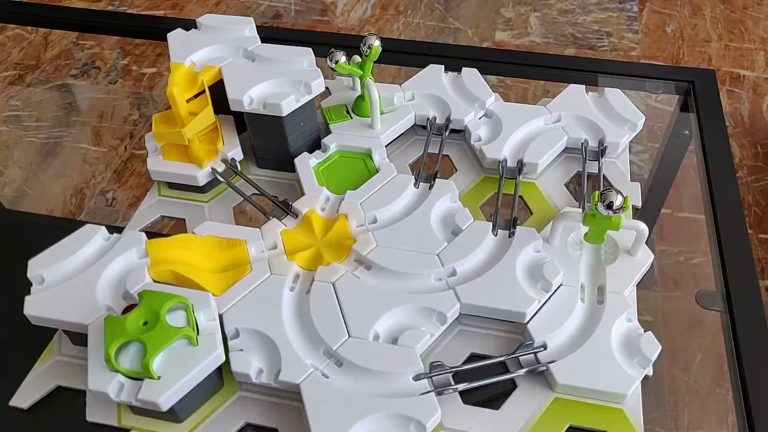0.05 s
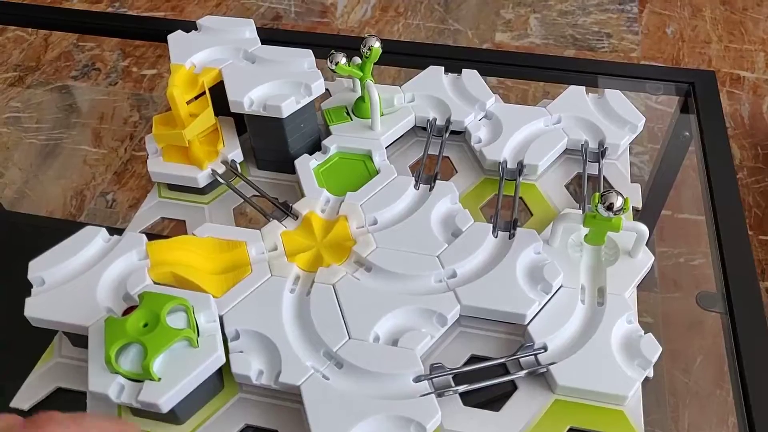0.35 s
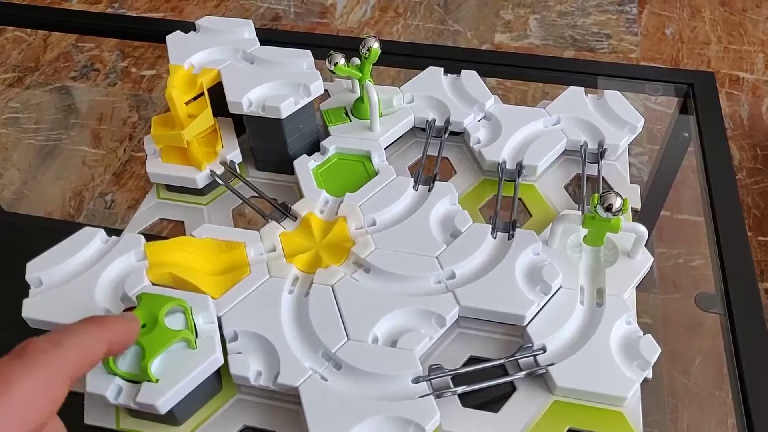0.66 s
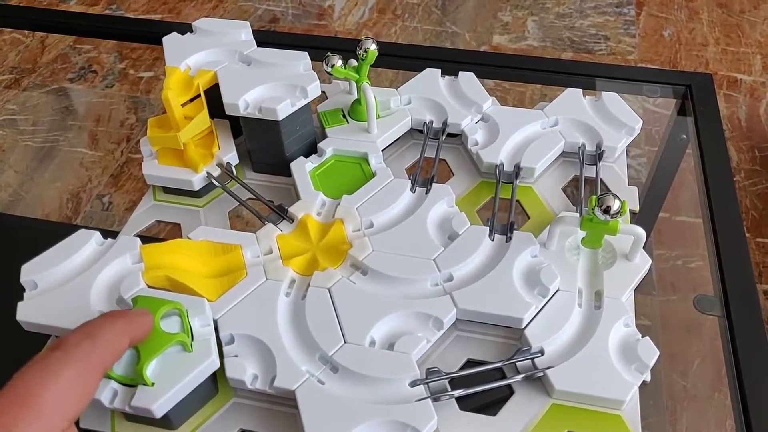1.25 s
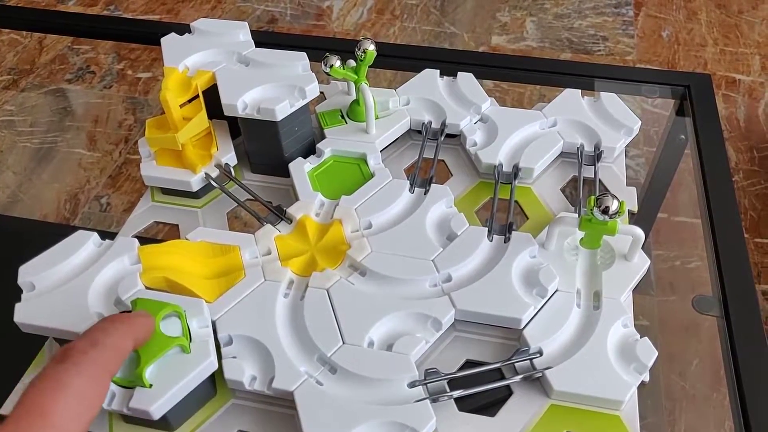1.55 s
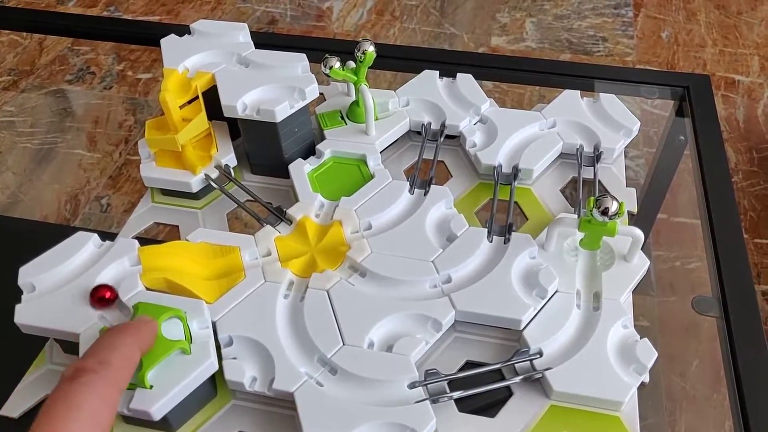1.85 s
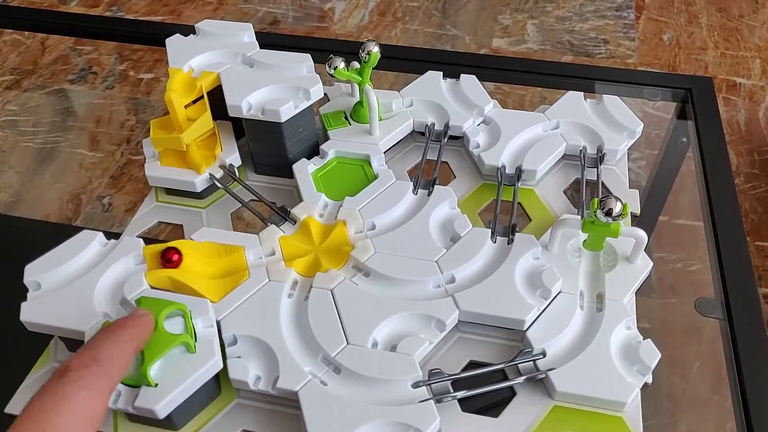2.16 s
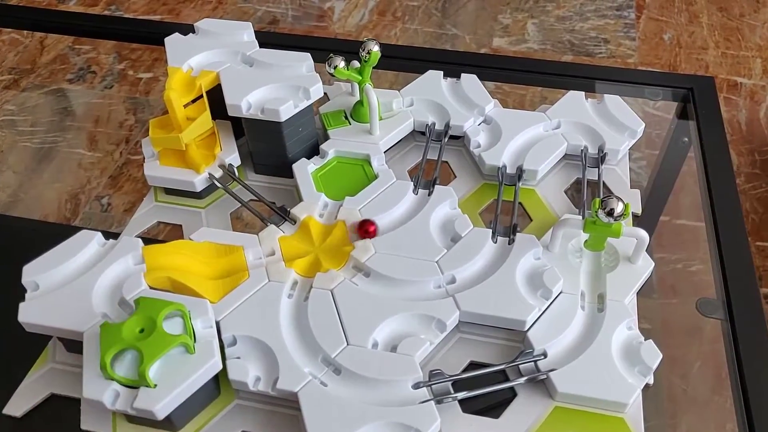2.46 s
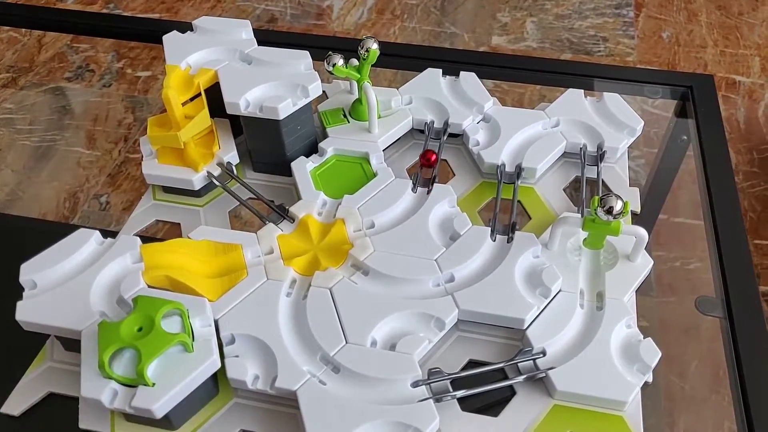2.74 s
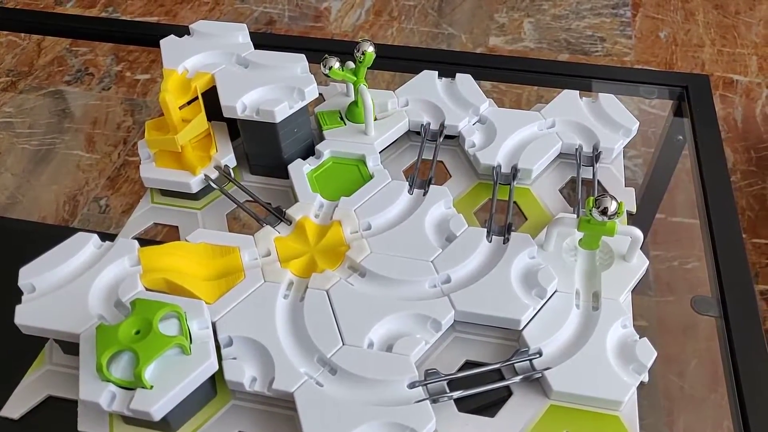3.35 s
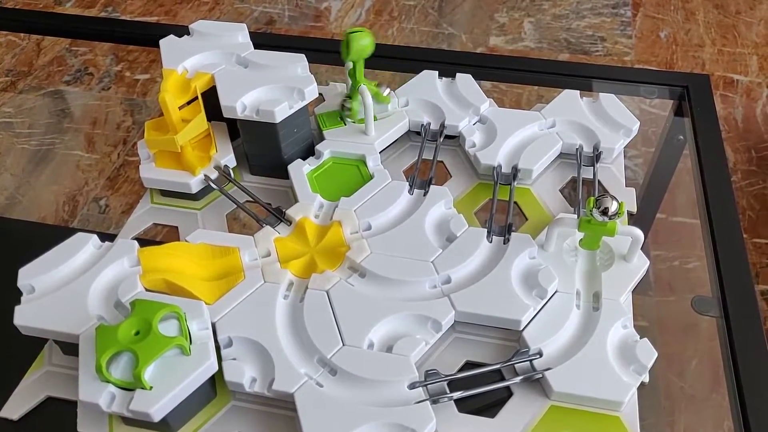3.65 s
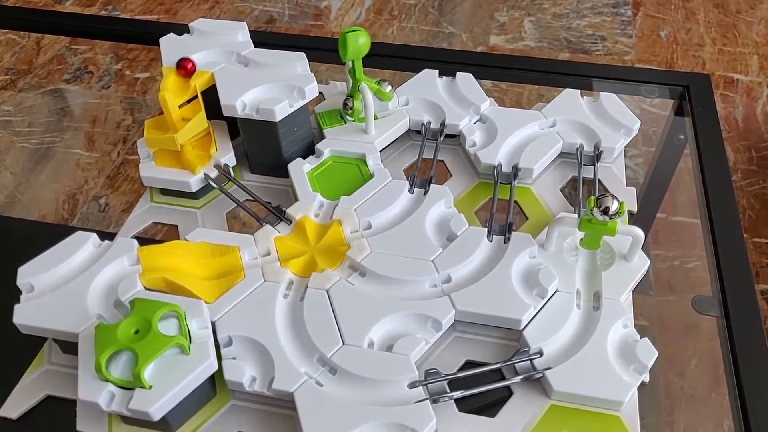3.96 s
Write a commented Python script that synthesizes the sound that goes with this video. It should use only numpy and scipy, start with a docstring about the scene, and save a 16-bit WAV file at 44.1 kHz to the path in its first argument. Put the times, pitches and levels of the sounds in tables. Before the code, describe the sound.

A marble rolls along a plastic track, clicking and clacking over chutes and metal rails.

```python
"""Marble run on a glass table

A launcher releases a marble. It clacks through a chute, rumbles along plastic grooves, crosses two
pairs of steel rails, trips a lever and is knocked up onto a higher tile. Contacts crack and ring the
parts; in rolling, tiny bumps of surface roughness drive their modes. The room is small and quiet,
with a soft thump at the start, a faint low hum and hiss."""
import sys
import numpy as np
from scipy import signal
from scipy.fft import rfft, irfft, next_fast_len
from scipy.io import wavfile
from scipy.ndimage import uniform_filter1d, map_coordinates

SR = 44100
rng = np.random.default_rng(int(sys.argv[2]) if len(sys.argv) > 2 else 0)


def bounce(signal):
    """Save signal as a 16-bit WAV file at the path given by the first command-line argument."""
    frames = np.transpose(np.atleast_2d(signal))
    limited = np.clip(frames, -1, 1)
    pcm = np.round(limited * 32767).astype(np.int16)
    wavfile.write(sys.argv[1], SR, pcm)


N = 176400
TIME = np.arange(N) / SR
ATTACK_S, HEAD_SAMPLES = 0.00032, 310  # a hit's level is set over its first 7 ms
BUMPS_PER_S, ROLL_ROOM_DB = 1400, -0.5
CONTACT_TOP_HZ = 8330  # soft contacts ring little above this


def clicks():
    """Each marble contact is a crack, a short dense ring of plastic and one stronger mode."""
    # start_s, body_db, clack_db, tick_db, air_db, snap_db, ring_hz
    contacts = [(1.7877, -49, -59, -57, -63, -80, 1010), (1.857, -46, -54, -58, -78, -80, 1306),
                (2.1602, -41, -45.5, -52.5, -59, -76, 724), (2.208, -46.5, -42, -44, -58, -59, 6540),
                (2.2227, -42.5, -41, -37.5, -43, -54, 5530), (2.2292, -56, -55, -37, -62, -61, 5450),
                (2.299, -34, -31, -44, -57.5, -71, 850), (2.3258, -17, -16.5, -19.5, -29.5, -44, 1195),
                (2.338, -30.5, -33, -38, -45, -68, 1600), (2.3712, -31, -28.5, -30, -43, -72, 4600),
                (2.4092, -34, -25.5, -26.5, -39, -62, 3470), (2.4325, -49, -34.5, -49, -51, -72, 3490),
                (2.4883, -34, -45, -51, -53, -75, 1060), (2.5394, -33.5, -32, -34, -45.5, -65, 1240),
                (2.558, -24, -30, -25, -43, -47, 832), (2.575, -41, -29, -31.5, -52, -72, 964),
                (2.6115, -35.5, -55, -53, -76, -73.5, 938), (2.7648, -49, -34.5, -26, -35.5, -53, 6130),
                (2.774, -49, -37, -30.5, -50, -68, 4770), (2.8436, -50.5, -37, -31, -44.5, -64, 5020),
                (2.8577, -62, -33, -41, -52, -76, 5500), (2.9234, -45.5, -41.5, -35, -51, -57, 5280),
                (2.937, -43.5, -33, -32.5, -47, -73, 5660), (3.0046, -37, -42.5, -39.5, -65, -85, 860),
                (3.0404, -40, -44, -41.5, -58, -80, 810), (3.389, -41, -33.5, -33.5, -38.5, -46, 1296),
                (3.4314, -39, -50, -38, -47, -64, 1146), (3.453, -41.5, -43, -43, -40.5, -75, 4030),
                (3.5568, -53, -39, -37, -42.5, -76, 3050), (3.7456, -49, -36, -26, -43.5, -78, 3760),
                (3.8126, -21, -21, -15, -22, -35.5, 6360), (3.8222, -45, -30, -25, -37, -58, 5060),
                (3.9898, -37.5, -31.5, -29.5, -48, -72, 774)]
    # body, clack, tick, air, snap: low_hz, high_hz, gain_db, t60_s, room_db
    plastic_bands = [(630, 1510, -1, 0.032, -3.5), (1540, 4030, -2.5, 0.035, -4),
                     (3850, 6540, -1, 0.03, -6), (6840, 9110, 1, 0.027, -4.5),
                     (11900, 15500, -2.5, 0.012, -8)]
    # tile under the contact: low_hz, high_hz, gain_db, t60_s, room_db
    thud_band = (186, 665, -12.5, 0.11, -3)
    crack_db, crack_t60_s = 4.5, 0.0039
    ring_db, ring_t60_s, ring_room_db = -3, 0.036, -10.5
    n = SR // 10
    t = TIME[:n]
    rise = 1 - np.exp(-t / ATTACK_S)
    crack = amp(crack_db - 60 * t / crack_t60_s)
    direct, wet = np.zeros(N + SR), np.zeros((2, N + SR))
    bands = [thud_band] + plastic_bands
    for contact, tail in zip(contacts, room_tails(len(contacts))):
        start_s, body_db, clack_db, tick_db, air_db, snap_db, ring_hz = contact
        ring = np.sin(2 * np.pi * ring_hz * t) * rise * amp(-60 * t / ring_t60_s)
        hit = amp(max(body_db, clack_db, tick_db) + ring_db) * ring / np.std(ring[:HEAD_SAMPLES])
        send = amp(ring_room_db) * hit
        levels_db = (body_db, body_db, clack_db, tick_db, air_db, snap_db)
        for level_db, (low_hz, high_hz, gain_db, t60_s, room_db) in zip(levels_db, bands):
            bandpass = signal.butter(4, [low_hz, high_hz], "band", fs=SR, output="sos")
            envelope = rise * (amp(-60 * t / t60_s) + crack)
            burst = signal.sosfilt(bandpass, envelope * rng.standard_normal(n))
            burst *= amp(level_db + gain_db) / np.sqrt(np.sum(burst ** 2) / HEAD_SAMPLES)
            hit += burst
            send += amp(room_db) * burst
        i = round(start_s * SR)
        direct[i:i + n] += hit
        echo = signal.fftconvolve(send[None], tail, axes=1)
        wet[:, i:i + echo.shape[1]] += echo
    return placed(direct[:N]) + wet[:, :N]


def rolling():
    """Bumps drive the plastic groove, its tile and, through them, the table; gentle rolling is duller."""
    levels = [(1.6, -120), (1.78, -67), (1.87, -54), (1.92, -43.5), (1.97, -50.5), (2.13, -56.5),
              (2.25, -45.5), (2.32, -44.5), (2.345, -30.5), (2.42, -35.5), (2.49, -33.5), (2.54, -36.5),
              (2.6, -59), (2.615, -44.5), (2.69, -39), (2.76, -39.5), (2.8, -57), (2.99, -53.5),
              (3.015, -39), (3.1, -44.5), (3.22, -50), (3.32, -55), (3.42, -48.5), (3.72, -68),
              (3.77, -43.5), (3.805, -61), (3.84, -42), (3.92, -38.5), (4, -45.5)]  # time_s, level_db
    groove_spectrum = [(100, -6), (170, -56), (400, -2.5), (540, -7.5), (720, -6), (1050, 1.5),
                       (1300, -5.5), (1800, -5.5), (2700, -14), (3500, -7.5), (6000, -10.5), (7500, -23),
                       (9200, -24), (10500, -60), (16000, -57)]  # freq_hz, gain_db
    tile_modes = [(683, 34, -5), (911.6, 46, 14.5), (1062, 25, 1.5), (1254, 40, -9), (1462, 15, 4),
                  (1586, 24, -5), (2266, 16, 2.5), (3455, 51, -2)]  # freq_hz, width_hz, gain_db
    table_modes = [(201.3, 23, -1), (252.8, 3.2, 5), (329.8, 11, 1.5)]  # freq_hz, width_hz, gain_db
    dull_hz, bright_db = 2300, -42  # treble fades when rolling is below bright_db
    tile_db, table_db, table_db_per_db = -4.5, -25.5, 0.6
    drive = bumps(BUMPS_PER_S)
    level_db = curve(levels)[0]
    groove = unit(filtered(drive, lambda hz: amp(along(groove_spectrum, hz))))
    dull = filtered(groove, lambda hz: 1 / (1 + (hz / dull_hz) ** 6))
    groove = dull + (groove - dull) * amp(np.minimum(level_db - bright_db, 0) / 2)
    tile = amp(level_db + tile_db) * unit(resonate(drive, tile_modes))
    table_gain = (TIME > levels[0][0]) * amp(table_db + table_db_per_db * level_db)
    table = table_gain * unit(resonate(drive, table_modes))
    return in_room(amp(level_db) * groove, ROLL_ROOM_DB) + placed(tile + table)


def rails():
    """Steel rods tick and sing while the marble runs on them."""
    levels = [(2.73, -53.5), (2.772, -28), (2.82, -55), (2.88, -42), (2.95, -40.5), (3.03, -54),
              (3.15, -59.5), (3.3, -76), (3.805, -92), (3.825, -26.5), (3.88, -35.5), (3.95, -34.5),
              (4, -53)]  # time_s, level_db
    modes = [(4860, 33, 12), (5220, 57, 10.5), (5520, 77, 11), (6280, 100, 7), (6310, 130, 7),
             (6895, 15, 11.5), (9000, 335, -13)]  # freq_hz, width_hz, gain_db
    return rubbed(levels, modes, bumps_per_s=630, room_db=-9)


def lever():
    """The plastic lever rubs on its pivot as it swings and gives one hollow knock."""
    swing_levels = [(3.41, -66), (3.46, -37.5), (3.5, -49.5), (3.53, -62), (3.565, -31.5), (3.6, -43.5),
                    (3.68, -65), (3.76, -55)]  # time_s, level_db
    modes = [(1120, 100, -2), (2180, 430, 0.5), (3170, 590, 2), (3980, 285, 3.5), (5600, 2600, 0.5),
             (7760, 1300, -17)]  # freq_hz, width_hz, gain_db
    knock_s, knock_hz, knock_db, t60_s, rise_s = 3.558, 1084, -26, 0.061, 0.0035
    age_s = np.maximum(TIME - knock_s, 0)
    envelope = amp(knock_db - 60 * age_s / t60_s) * (1 - np.exp(-age_s / rise_s))
    knock = envelope * np.sin(2 * np.pi * knock_hz * age_s)
    return rubbed(swing_levels, modes, bumps_per_s=700, room_db=-2.5) + placed(knock)


def knocks():
    """Marble and lever knock drily on the hollow parts at the back."""
    hits = [(3.1803, -27, 3330, 2.1), (3.3692, -41.5, 3350, 1.1), (3.438, -28, 3530, 0.36),
            (3.4873, -41, 3220, 0.27), (3.5188, -38, 4200, 1.46), (3.5312, -26.5, 1400, 1),
            (3.584, -38, 3500, 1.17)]  # start_s, level_db, centre_hz, spread_octaves
    modes = [(790, -1.5, 0.017), (1160, -14, 0.01), (2190, -0.5, 0.0079), (2630, -1, 0.011),
             (3075, -7, 0.018), (3840, -10, 0.01), (4200, -9, 0.027), (6030, -5.5, 0.037)]  # freq_hz, gain_db, t60_s
    return struck(hits, modes, crack_db=-0.5, crack_t60_s=0.045, room_db=-7)


def launcher():
    """The launcher clicks twice as it lets the marble go."""
    hits = [(1.9034, -32, 3720, 1), (1.9522, -33.5, 2260, 0.94)]  # start_s, level_db, centre_hz, spread_octaves
    modes = [(1280, -3, 0.03), (1843.3, -2.5, 0.062), (3566, 1, 0.034), (4920, -1, 0.022),
             (5510, -11.5, .09), (5900, -21, 0.0404)]  # freq_hz, gain_db, t60_s
    return struck(hits, modes, crack_db=9, crack_t60_s=0.03, room_db=-10)


def hollow_tiles():
    """Hollow tiles at the back hum under the rolling marble."""
    levels = [(2.995, -67), (3.02, -42.5), (3.1, -66), (3.22, -63), (3.3, -46), (3.35, -64), (3.4, -66),
              (3.8, -67), (3.83, -47), (4, -38.5)]  # time_s, level_db
    modes = [(726, 103, 1.5), (835, 81, -2), (987, 46, -3)]  # freq_hz, width_hz, gain_db
    return rubbed(levels, modes, BUMPS_PER_S, ROLL_ROOM_DB)


def thump():
    """A soft push of pressure that dies away."""
    start_s, level_db, t60_s, cutoff_hz = 0.372, -43, 0.96, 900
    age_s = np.maximum(TIME - start_s, 0)
    push = (age_s > 0) * amp(level_db - 60 * age_s / t60_s)
    return signal.sosfilt(signal.butter(2, cutoff_hz, fs=SR, output="sos"), push)


def hum():
    """A low hum of noise in narrow resonances, slightly louder on the left."""
    levels = [(.15, -110), (.36, -77), (.42, -55.5), (1, -51), (1.65, -45.5), (2.1, -45), (2.6, -71),
              (3.1, -53), (3.6, -46.5), (4, -44)]  # time_s, level_db
    modes = [(30.14, 1.5, 0.5), (52.2, 8.8, -15), (62.2, 3.6, -17), (103, 7.4, -25)]  # freq_hz, width_hz, gain_db
    drone = resonate(rng.standard_normal(N), modes)
    running_rms = np.sqrt(np.abs(uniform_filter1d(drone ** 2, size=SR // 8)) + 1e-20)
    return unit(drone / running_rms) * amp(curve(levels)[0]) * amp([[0.7], [-0.7]])


def hiss():
    """Faint hiss, wider in the treble, with a thin whirr in it."""
    levels = [(.185, -130), (.205, -77), (.3, -66.5), (.42, -60), (.8, -58.5), (4, -53.5)]  # time_s, level_db
    spectrum = [(20, 16), (100, 14.5), (220, 10), (480, -1.5), (1000, -3), (1280, -7), (1700, -3),
                (2100, -5), (2900, -12), (4500, -9.5), (6200, -11.5), (7500, -14.5), (11000, -16.5),
                (16000, -22.5)]  # freq_hz, gain_db
    whirr_modes = [(1630, 41, -0.5), (1940, 68, 5), (2020, 6.2, 11.5), (3930, 53, -13), (5700, 380, -11),
                   (6500, 130, -0.5)]  # freq_hz, width_hz, gain_db
    whirr_db = -7
    noise = rng.standard_normal((3, N))  # left, right, common
    air = noise[2] + filtered(noise[:2], lambda hz: along([(150, 0.53), (1500, 2.46)], hz))
    broadband = unit(filtered(air, lambda hz: amp(along(spectrum, hz))))
    whirr = amp(whirr_db) * unit(resonate(air, whirr_modes))
    return (broadband + whirr) * amp(curve(levels)[0])


def bumps(per_s):
    """Tiny random impacts of surface roughness; their strength flutters."""
    spread_db, flutter_db, flutter_knots_per_s = 3, 5, 70
    train = (rng.random(N) < per_s / SR) * rng.choice([-1, 1], N)
    strength = amp(spread_db * np.clip(rng.standard_normal(N), -2, 2))
    knots = rng.standard_normal(int(N * flutter_knots_per_s / SR) + 4)
    flutter = map_coordinates(knots, [TIME * flutter_knots_per_s])
    return train * strength * amp(flutter_db * flutter)


def rubbed(levels, modes, bumps_per_s, room_db):
    """Bumps ring a part's modes along a level curve."""
    ring = unit(filtered(resonate(bumps(bumps_per_s), modes), soft_contact))
    envelope = (TIME > levels[0][0]) * amp(curve(levels)[0])
    return in_room(envelope * ring, room_db)


def struck(hits, modes, crack_db, crack_t60_s, room_db):
    """Blows ring a part's modes over a short crack; each favours its own range of pitch."""
    n = SR // 5
    t, track = TIME[:n], np.zeros(N + SR)
    rise = 1 - np.exp(-t / ATTACK_S)
    for start_s, level_db, centre_hz, spread_octaves in hits:
        def emphasis(hz):
            octaves = np.log2((hz + 1) / centre_hz)
            return np.exp(-0.5 * (octaves / spread_octaves) ** 2) * soft_contact(hz)

        ring = np.zeros(n)
        for k, (freq_hz, gain_db, t60_s) in enumerate(modes):
            decay = amp(gain_db + rng.normal(0, 1) - 60 * t / t60_s)
            ring += (-1) ** k * decay * np.sin(2 * np.pi * freq_hz * t)
        crack = amp(crack_db - 60 * t / crack_t60_s) * rng.standard_normal(n)
        hit = filtered((ring + crack) * rise, emphasis)
        track[round(start_s * SR):][:n] += amp(level_db) * hit / np.std(hit[:HEAD_SAMPLES])
    return in_room(track[:N], room_db)


def soft_contact(hz):
    """Steep low-pass gain of a soft contact."""
    return 1 / np.sqrt(1 + (hz / CONTACT_TOP_HZ) ** 20)


def placed(x):
    """The marble's position sets level and delay at the two microphones."""
    path = [(1.9, 4.5, 0.2), (2.25, 2.5, 0.19), (2.34, 4, 0.2), (2.43, 0, 0.047), (2.57, 0.5, 0.048),
            (2.9, 0, 0.038), (3.5, 0, 0.047), (3.8, 1.5, 0.086), (4, 1.5, 0.15)]  # time_s, left_minus_right_db, left_lead_ms
    pan_db, lead_ms = curve(path)
    shift_samples = lead_ms * SR / 2000  # half the lead per side
    return np.array([amp(side * pan_db / 2) * map_coordinates(x, [np.arange(N) + side * shift_samples])
                     for side in (1, -1)])


def in_room(x, room_db):
    """Direct sound from the marble's position plus reverberation."""
    wet = signal.fftconvolve(x[None], room_tails(1)[0], axes=1)[:, :N]
    return (placed(x) + amp(room_db) * wet) / np.hypot(1, amp(room_db))


def room_tails(count):
    """Stereo room responses of unit energy: decaying noise, alike on both sides in the bass."""
    decay_times = [(200, 0.49), (600, 0.44), (1400, 0.76), (4000, 0.48), (9000, 0.39), (14000, 0.53)]  # freq_hz, t60_s
    coherence = [(250, 0.9), (600, 0.63), (1200, 0), (2500, 0)]  # freq_hz, left_right_correlation
    build_s, n = 0.00078, SR // 2
    hz, t, spectra = signal.stft(rng.standard_normal((count, 2, n)), SR, nperseg=256)
    angle_rad = np.arccos(np.clip(along(coherence, hz), -1, 1))[:, None] / 2
    mid, side = np.cos(angle_rad) * spectra[:, 0], np.sin(angle_rad) * spectra[:, 1]
    stereo = np.stack([mid + side, mid - side], axis=1)
    decay = amp(-60 * t / along(decay_times, hz)[:, None])
    tails = signal.istft(stereo * decay, SR, nperseg=256)[1][..., :n]
    tails *= 1 - np.exp(-TIME[:n] / build_s)
    return tails / np.linalg.norm(tails, axis=-1, keepdims=True)


def resonate(x, modes):
    """Parallel resonances of alternating sign."""
    def response(hz):
        return sum((-1) ** k * amp(gain_db) * 1j * hz * width_hz
                   / (freq_hz ** 2 - hz ** 2 + 1j * hz * width_hz)
                   for k, (freq_hz, width_hz, gain_db) in enumerate(modes))
    return filtered(x, response)


def filtered(x, response):
    """Apply response(hz) by zero-padded FFT."""
    n = x.shape[-1]
    padded = next_fast_len(n + SR // 2)
    return irfft(rfft(x, padded) * response(np.fft.rfftfreq(padded, 1 / SR)), padded)[..., :n]


def along(points, hz):
    """Interpolate (freq_hz, value) points on a log axis."""
    freq_hz, values = np.transpose(points)
    return np.interp(np.log(hz + 1), np.log(freq_hz + 1), values)


def curve(rows):
    """Interpolate each column after time_s over TIME."""
    time_s, *columns = np.transpose(rows)
    return [np.interp(TIME, time_s, column) for column in columns]


def amp(db):
    return 10 ** (np.asarray(db) / 20)


def unit(x):
    """Scale to RMS 1."""
    return x / np.sqrt(np.mean(x ** 2) + 1e-20)


def scene():
    """Marble, track and background in stereo."""
    marble_run = launcher() + clicks() + knocks() + rolling() + hollow_tiles() + rails() + lever()
    return marble_run + thump() + hum() + hiss()


def record(dry):
    """Each microphone port colours the treble; peaks are rounded and the band is limited."""
    left_port = [(300, 0.5), (1200, -1.5), (3000, 0.5), (4600, -2), (5900, 4.5), (7000, -1.5), (8000, -4),
                 (8700, -21), (11500, -4), (15000, -2)]  # freq_hz, gain_db
    right_port = [(300, -0.5), (1200, -3), (3000, 1), (4600, 0.5), (6200, -8), (7000, 0), (8000, -2.5),
                  (9000, 1), (11500, -9), (15000, 3.5)]  # freq_hz, gain_db
    ceiling, top_hz = 0.9, 16300
    coloured = filtered(dry, lambda hz: amp([along(left_port, hz), along(right_port, hz)]))
    rounded = coloured / (1 + (coloured / ceiling) ** 6) ** (1 / 6)
    return filtered(rounded, lambda hz: hz < top_hz)


dry = scene()
out = record(dry)
bounce(out)
```